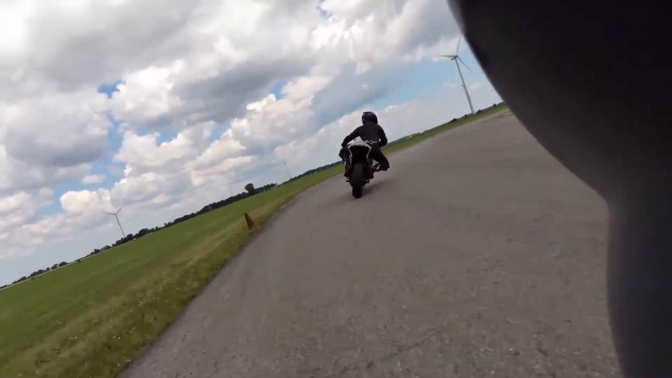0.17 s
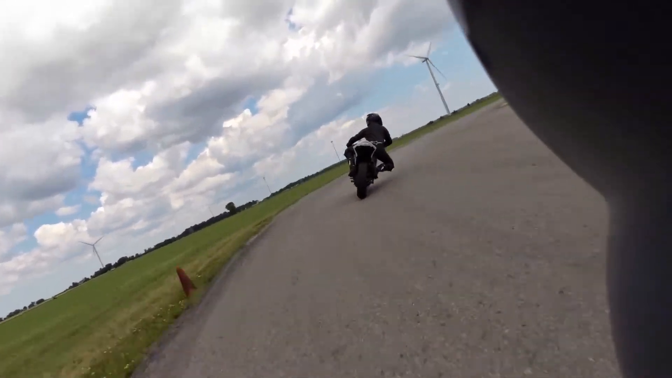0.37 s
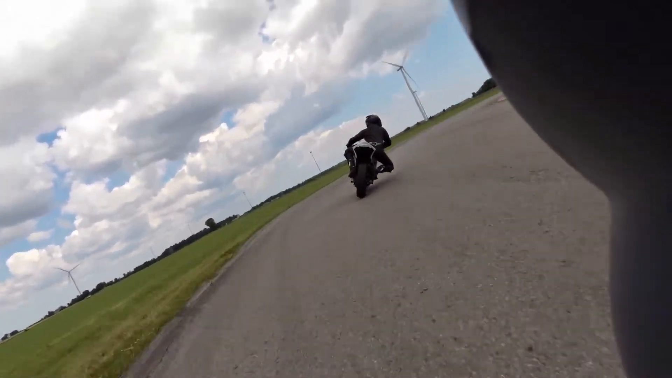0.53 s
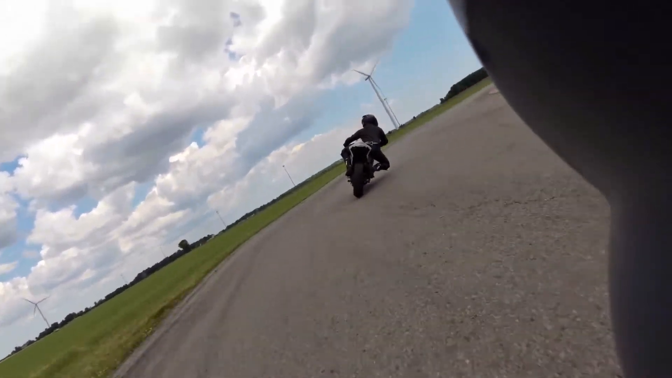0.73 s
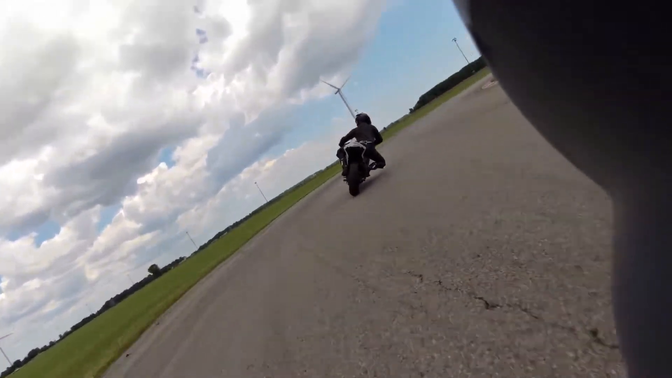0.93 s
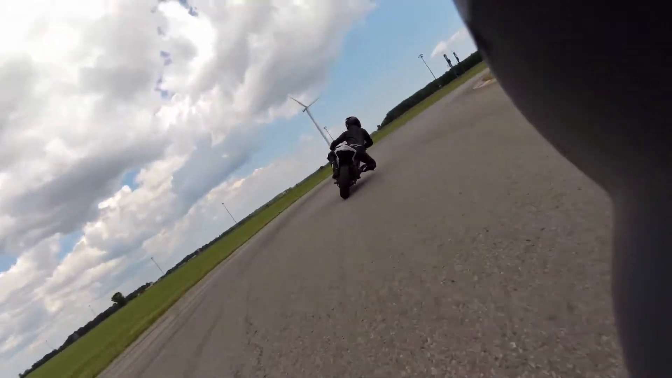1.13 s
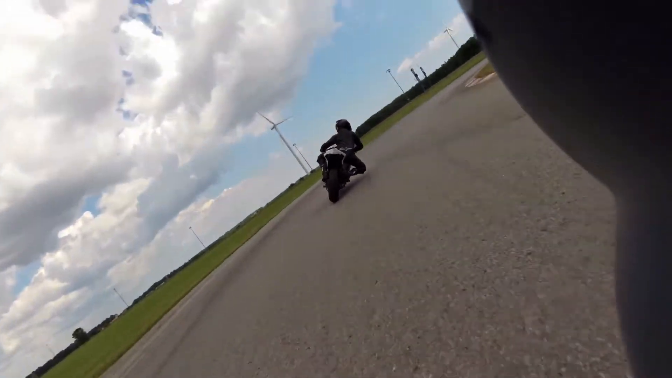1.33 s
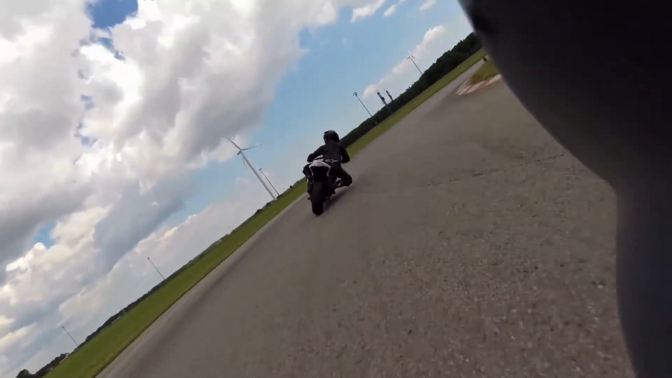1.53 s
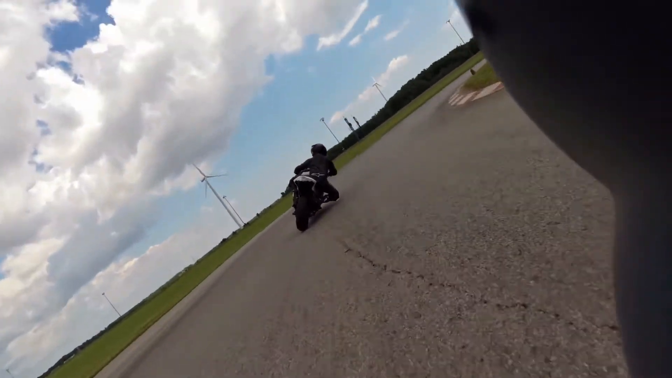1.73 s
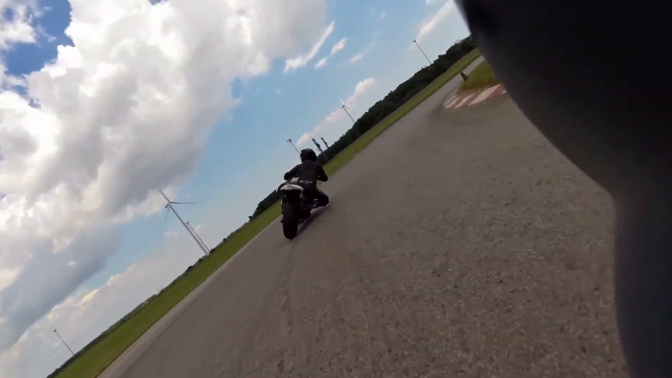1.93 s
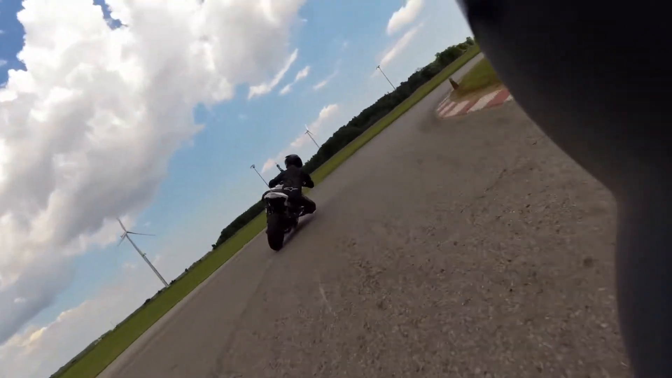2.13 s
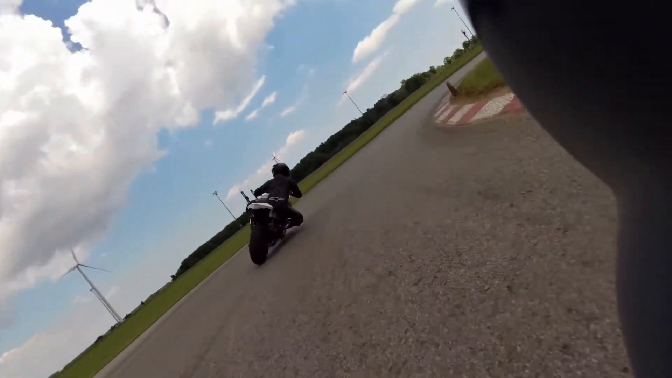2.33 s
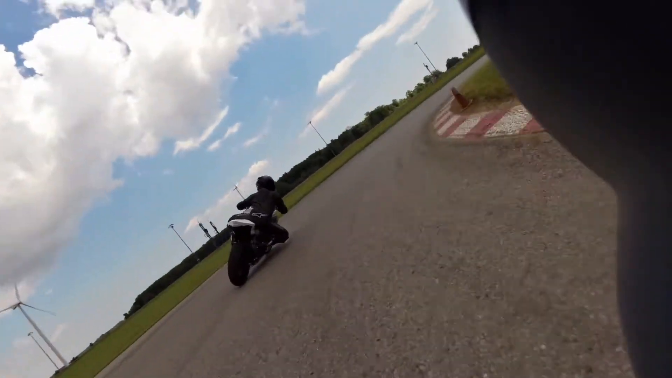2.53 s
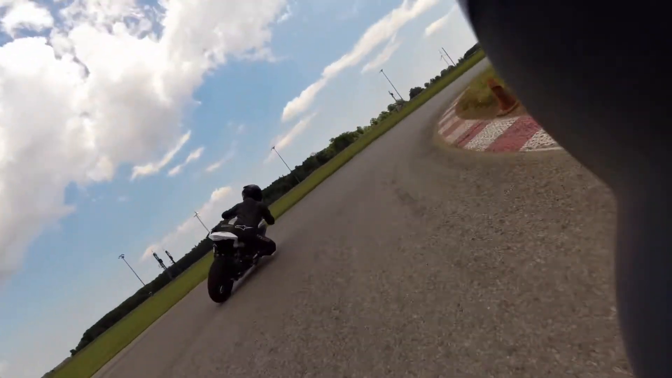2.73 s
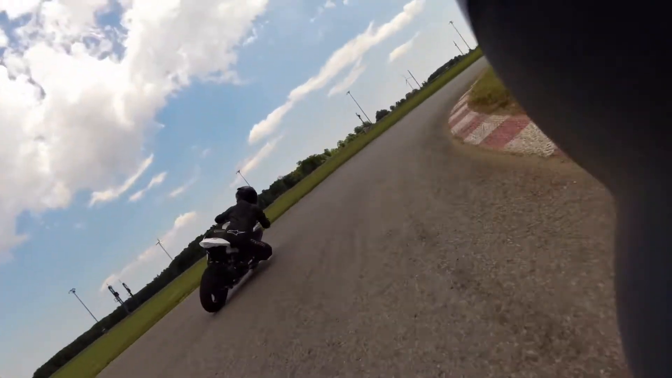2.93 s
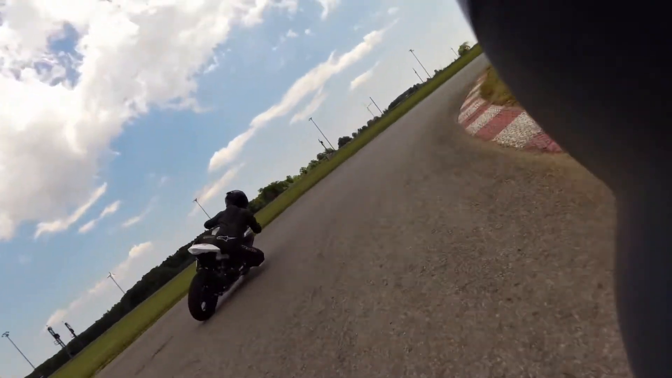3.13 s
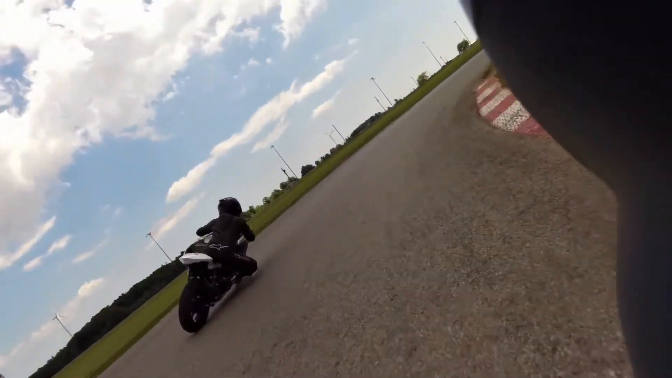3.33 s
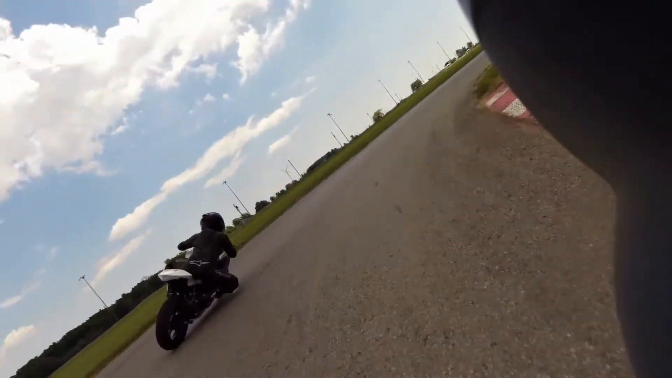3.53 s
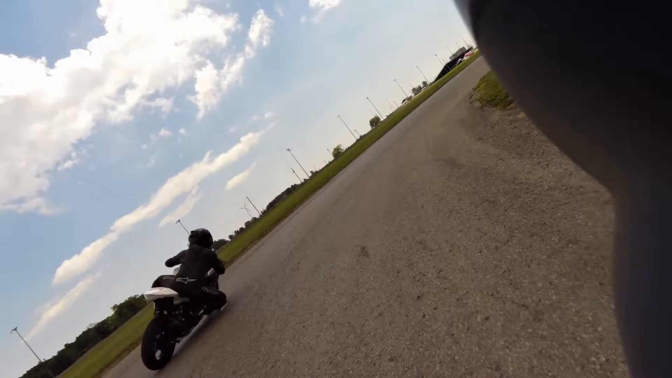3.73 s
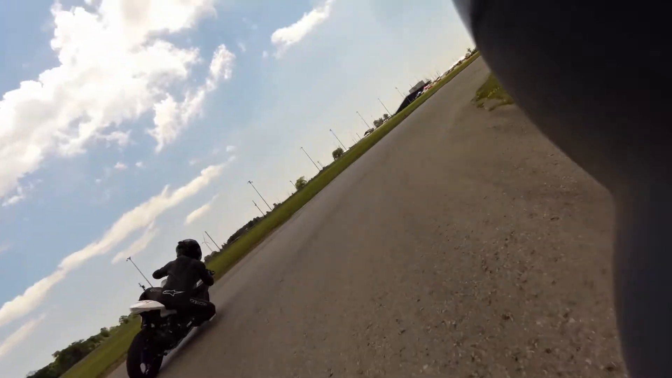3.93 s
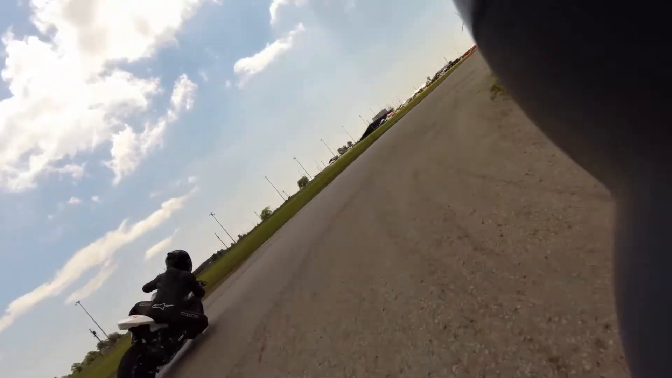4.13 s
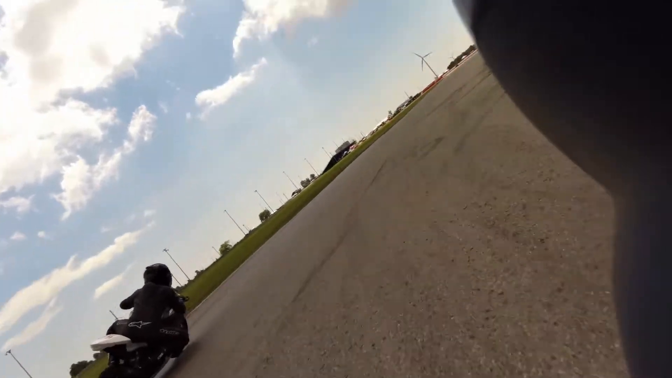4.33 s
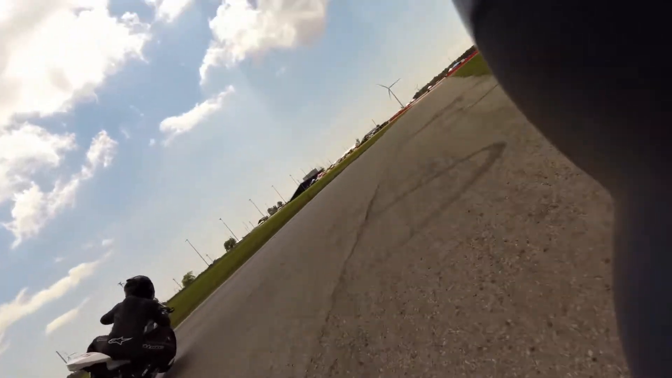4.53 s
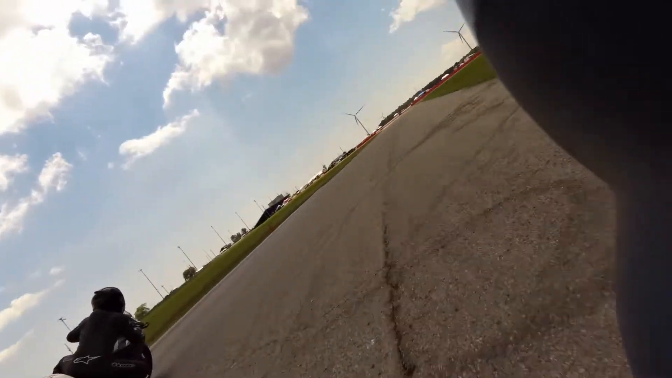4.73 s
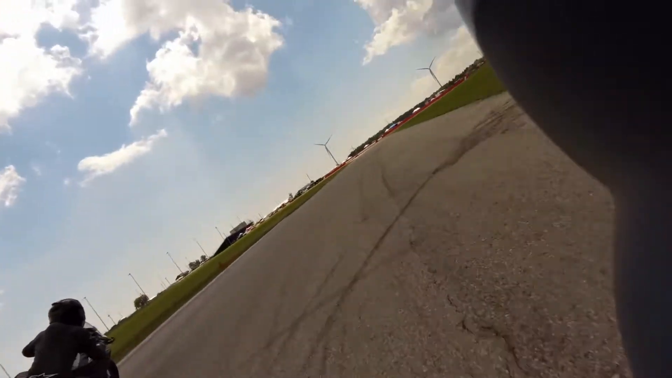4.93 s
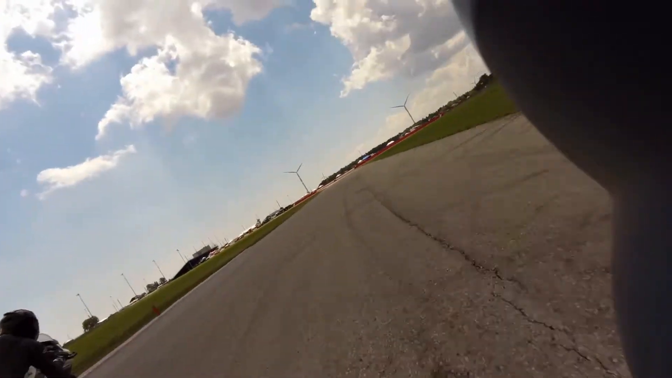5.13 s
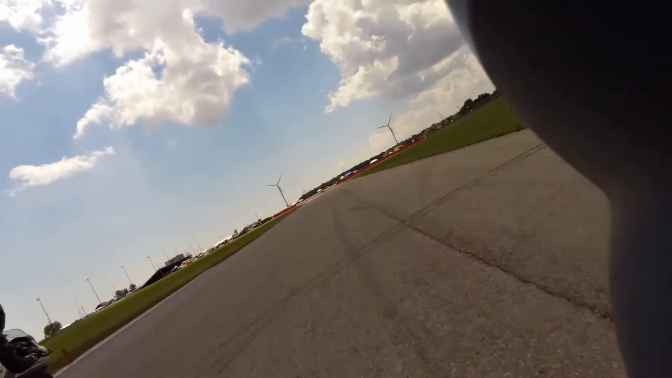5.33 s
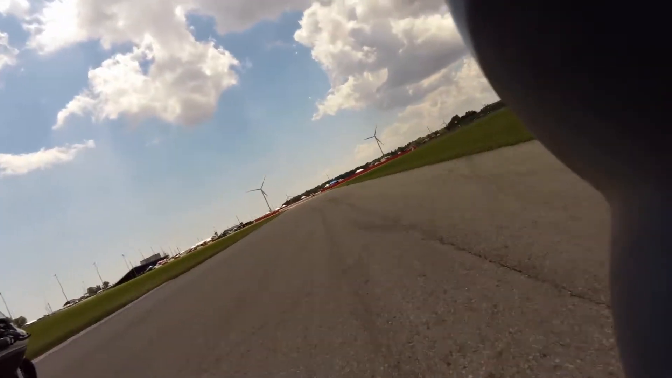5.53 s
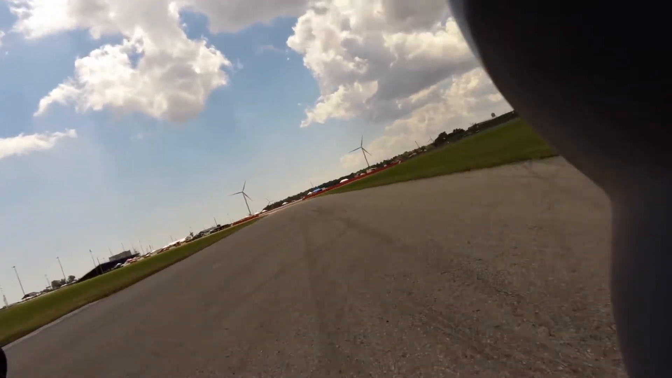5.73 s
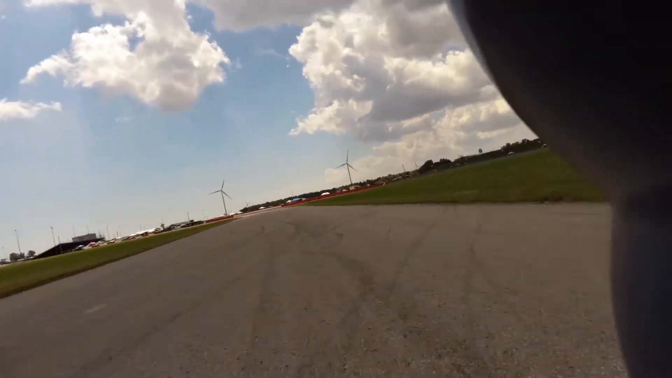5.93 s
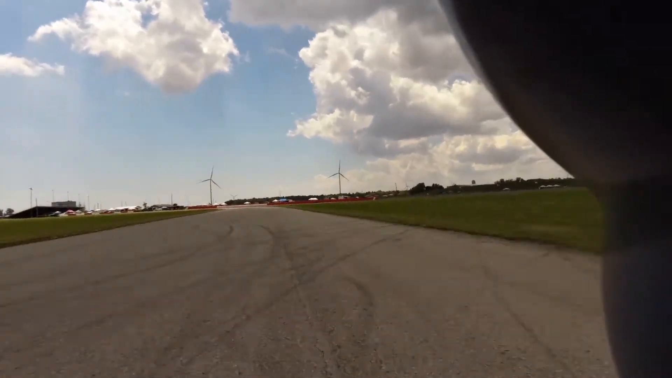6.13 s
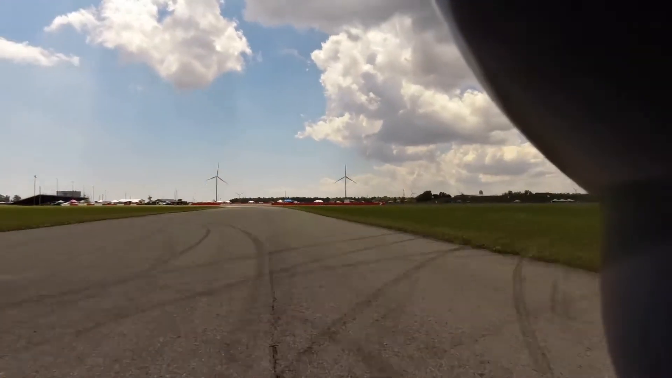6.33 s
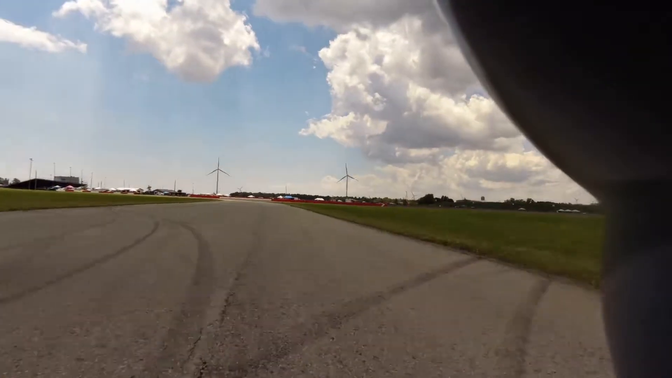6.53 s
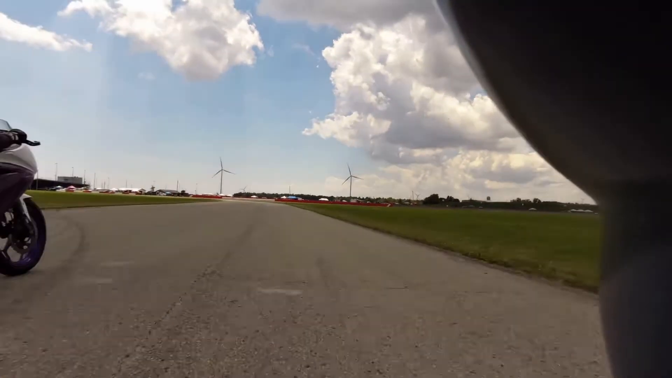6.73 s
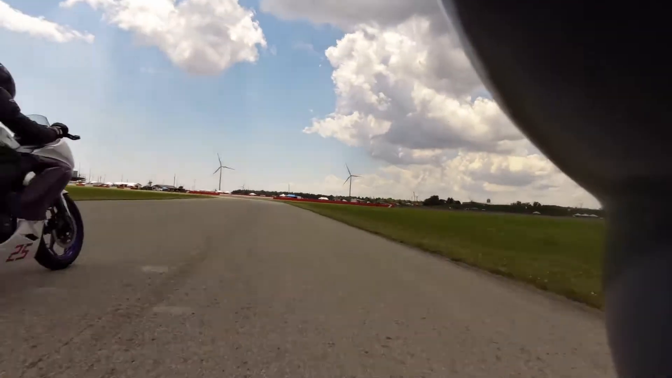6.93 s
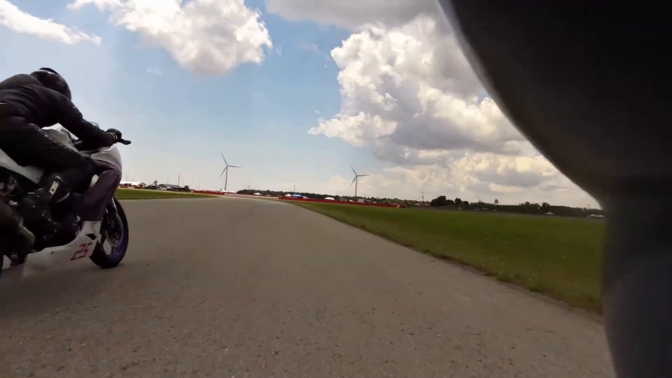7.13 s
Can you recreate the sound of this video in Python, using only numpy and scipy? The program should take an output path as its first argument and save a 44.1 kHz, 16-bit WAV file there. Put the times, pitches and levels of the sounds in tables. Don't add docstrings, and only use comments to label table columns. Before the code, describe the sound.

A microphone strapped to a sport motorcycle on an open race track. The engine begins loud and buzzing, falling in pitch while a loose housing rattles in bursts. It thins into a coast, with a bump, faint gear whine and low hum. Then the throttle opens, gears whine upward and the engine climbs, joined by a second bike's rising howl. Wind buffets the overloaded, muffled microphone.

```python
import sys
import numpy as np
from scipy import signal
from scipy.io import wavfile
from scipy.ndimage import uniform_filter1d

SR = 44100
rng = np.random.default_rng(int(sys.argv[2]) if len(sys.argv) > 2 else 0)


def to_linear_factor(level_db):
    exponent = np.asarray(level_db, float) / 20
    return 10 ** exponent


def pcm_store(signal):
    levels = np.round(np.clip(np.atleast_2d(signal), -1, 1) * 32767)
    wavfile.write(sys.argv[1], SR, levels.astype(np.int16).T)


N = 316638

OVERRUN_ENDS_S, OVERRUN_FADE_S = 2.06, 0.5
PULL_S, PULL_RISE_S = 4.5, 0.14


def rms_one(x):
    return x / np.sqrt(np.mean(x ** 2) + 1e-20)


def in_time(rows):
    s, *columns = np.transpose(rows)
    return [np.interp(np.arange(N) / SR, s, c) for c in columns]


def at_hz(points, hz):
    point_hz, point_db = np.transpose(points)
    return np.interp(np.log(hz), np.log(point_hz), point_db)


def smooth(coarse):
    return np.interp(np.arange(N) / 40, np.arange(len(coarse)), coarse)


def ramp(start_s, rise_s):
    return np.clip((np.arange(N) / SR - start_s) / rise_s, 0, 1)


def drift(rate):
    r = np.exp(-80 * np.pi * rate / SR)
    settle = 2000
    white = rng.standard_normal(len(range(0, N, 40)) + settle)
    return rms_one(signal.lfilter([1], [1, -2 * r, r * r], white)[settle:])


def resonance(x, hz, width_hz):
    r = np.exp(-np.pi * width_hz / SR)
    top = np.array([1, 0, -1]) * (1 - r * r) / 2
    return signal.lfilter(top, [1, -2 * r * np.cos(2 * np.pi * hz / SR), r * r], x + 1e-18)


def banded_noise(spectrum, tilt, patchy_db, low_hz, count):
    edges = low_hz * 2 ** (np.arange(count + 1) / 3)
    white = rng.standard_normal((2, N))
    out, power = 0, 0
    for k, (low, high) in enumerate(zip(edges, edges[1:])):
        sos = signal.butter(2, [low, high], "band", fs=SR, output="sos")
        band = signal.sosfilt(sos, white[k % 2])
        hz = np.sqrt(low * high)
        band_db = at_hz(spectrum, hz)
        out = out + band * smooth(to_linear_factor(band_db + tilt * np.log2(hz / 200) + patchy_db * drift(26)))
        power += to_linear_factor(2 * band_db) * 2 * (high - low) / SR
    return out / np.sqrt(power)


def crank(hz, wander):
    return np.cumsum(hz) / SR + smooth(wander * drift(10))


def partial(turns, order, level_db, flutter_db, lead=0.):
    height = np.sqrt(2) * smooth(to_linear_factor(level_db[::40] + flutter_db * drift(20)))
    return height * np.cos(2 * np.pi * order * turns + lead)


def whine(rows, wander):
    before = (0.015, rows[0][1], -92.5)
    after = (N / SR, rows[-1][1], -90)
    hz, level_db = in_time([before] + rows + [after])
    return partial(crank(hz, wander), 0.99, level_db, flutter_db=2.0)


def own_throttle():
    # (time [s], firing rate [Hz], shake [dB], edge of the firing pulse [dB])
    ride = [(0.0, 217.2, -9.5, -5), (0.48, 202.5, -11, 1), (0.85, 198, -21, -1.5), (1.05, 196.7, -16.5, 1),
            (1.22, 196.8, -22, -4), (1.4, 194.2, -16, -0.5), (1.7, 193.2, -22.5, -2),
            (1.8, 193.8, -48.5, -2), (2.1, 192.6, -23.5, 1), (2.4, 187.5, -45, -5),
            (2.7, 188.7, -31.5, -15.5), (3.4, 178, -28.5, -21), (4.05, 187.5, -34, -12),
            (4.3, 195.3, -19, -5), (4.8, 213.7, -8, -7), (5.2, 232, -13, -1.5), (5.6, 236.1, -12.5, 1),
            (7.18, 263, -13.5, 1.5)]
    return in_time(ride)


def own_engine(turns, hz, shake_db, edge_db):
    # (order [x firing], overrun [dB], under power [dB], share of a lull in the shake [dB/dB])
    overtones = [
        (2, -19, -19, 0.02),
        (3, -17, -38, .4),
        (4, -21.5, -29.5, .3),
        (5, -34.5, -31, 0.18),
    ]
    # (order [x firing], level under order 4 [dB])
    upper = [
        (6, -12.5),
        (7, -16),
    ]
    lull_below_db = -22.5
    power = ramp(OVERRUN_ENDS_S, OVERRUN_FADE_S)
    above_lull_db = shake_db - lull_below_db
    orders_db = {}
    for k, over_db, pull_db, share in overtones:
        mix_db = over_db + power * (pull_db - over_db)
        orders_db[k] = edge_db + mix_db + share * np.minimum(above_lull_db, 0)

    bracket_hz, bracket_width_hz, bracket_loss_db = 600.2, 39.6, 28
    orders_db[3] -= bracket_loss_db * np.clip((3 * hz - bracket_hz) / bracket_width_hz, -1, 1) ** 4
    orders_db[2] -= 0.34 * np.maximum(above_lull_db, 0) * (1 - power)

    rough_overrun_db, rough_power_db = 1.8, 3.5
    rough_db = (rough_overrun_db + power * (rough_power_db - rough_overrun_db))[::40]
    out = partial(turns, 1, shake_db, flutter_db=rough_db)
    for k, db in orders_db.items():
        lead_rad = 1.1 * (k == 3)
        out += partial(turns, k, db, flutter_db=rough_db, lead=lead_rad)
    for k, db in upper:
        out += partial(turns, k, orders_db[4] + db, flutter_db=1.5)
    return out


def wind_buffet():
    # (time [s], buffet [dB])
    gust_levels = [(0, -25), (.5, -26), (1.1, -28.5), (1.55, -24), (1.75, -26), (1.96, -26), (2.25, -24),
                   (2.64, -22.5), (2.78, -22), (3.22, -24), (3.8, -25), (4.1, -22), (4.56, -20.5),
                   (4.8, -19.5), (5.4, -17.5), (5.95, -16.5), (6.4, -15.5), (7.18, -12.5)]
    # (frequency [Hz], density [dB per Hz])
    buffet_spectrum = [(25, -30.5), (45, -24.5), (70, -4.5), (110, -1.5), (165, 0), (240, -5), (400, -7),
                       (600, -13.5), (900, -14), (1400, -31.5), (2200, -43.5), (3500, -73)]
    buffet_db, = in_time(gust_levels)
    tilt = 0.29 + 2 * (1 - ramp(OVERRUN_ENDS_S, OVERRUN_FADE_S))
    gusts = to_linear_factor(buffet_db + 7 + smooth(1.7 * np.tanh(drift(40))))
    return gusts * banded_noise(buffet_spectrum, tilt[::40], patchy_db=0.5, low_hz=34.93, count=19)


def engine_hiss(turns, shake_db, edge_db):
    # (frequency [Hz], density [dB per Hz])
    hiss_spectrum = [(500, 8.5), (1000, 0.5), (1500, 3), (1800, -1), (2100, -5.5), (2600, -5), (3300, -13),
                     (3850, -12.5), (4500, -18.5), (5200, -43), (6500, -33), (9000, -38)]
    effort_db = -31 + 0.24 * shake_db + 0.3 * edge_db
    effort_db += 6 * (ramp(PULL_S, PULL_RISE_S) - ramp(OVERRUN_ENDS_S, OVERRUN_FADE_S))
    swell_db = 3.16 * np.cos(2 * np.pi * (turns - 0.15))
    gate = to_linear_factor(effort_db + 8.5 + swell_db + smooth(2.0 * drift(37)))
    return gate * banded_noise(hiss_spectrum, 0, patchy_db=0.0, low_hz=565, count=11)


def housing_air():
    return to_linear_factor(-49.5) * rms_one(resonance(rng.standard_normal(N), 3850, 280))


def rattle(turns, shake):
    # (time [s], peak [dB],
    # length [ms])
    bursts = [(0.07, -26, 9.9), (.121, -30, 6.2), (.159, -29, 7.9), (.234, -24, 13), (.278, -31, 48),
              (.358, -24.5, 34), (.425, -22, 52), (.468, -23, 21), (.542, -23.5, 39), (.6, -21, 160),
              (.71, -22.5, 70), (.766, -24.5, 21), (.838, -23, 20), (0.872, -27, 24), (.95, -26, 45),
              (1.029, -23.5, 80), (1.141, -27.5, 44), (1.33, -27.5, 29), (1.41, -20, 49),
              (1.465, -20.5, 43), (1.522, -24, 11), (1.574, -25, 18.8), (1.641, -23, 9), (1.687, -25, 38),
              (.305, -32, 30), (.805, -29, 22), (2.06, -24.5, 11), (2.1, -26.5, 43), (2.226, -22.5, 18),
              (2.155, -34.5, 25), (2.635, -37, 8), (4.64, -35, 25), (4.694, -29.5, 19),
                   (4.789, -31, 45), (5.01, -34, 30), (4.88, -39, 31), (5.16, -41, 35), (5.26, -37.5, 30),
                   (5.93, -33, 35), (6.73, -33, 33), (6.8, -30, 15), (6.85, -30, 21), (7.0, -33, 55)]
    # (lag after the peak [cycles], level [dB])
    contacts = [
        (.11, 0),
        (.2, -12),
        (.61, -9),
    ]
    # (frequency [Hz], width [Hz], level [dB])
    shell_modes = [
        (1540, 450, 2),
        (2740, 520, 0),
        (4076, 500, 0.5),
        (5014, 900, -9.5),
        (8600, 3900, -13),
    ]
    t = np.arange(N) / SR
    strength = ramp(PULL_S, PULL_RISE_S) * to_linear_factor(-46 + smooth(3.5 * np.tanh(drift(12))))
    for s, db, ms in bursts:
        near = slice(max(int((s - 0.12) * SR), 0), int((s + 0.12) * SR))
        rise_or_fall = np.where(t[near] < s, 0.6, 1)
        burst = to_linear_factor(db) * np.exp(-((t[near] - s) / (ms * 0.00073 * rise_or_fall)) ** 2)
        strength[near] = np.maximum(strength[near], burst)
    strength *= to_linear_factor(smooth(2.5 * drift(30)))

    hits = np.zeros(N)
    for lag, db in contacts:
        at = np.flatnonzero(np.diff(np.floor(turns - lag)) > 0)
        early_late = rng.integers(-4, 5, len(at))
        hits[np.clip(at + early_late, 0, N - 1)] = to_linear_factor(db)

    fall = -np.gradient(uniform_filter1d(shake, size=15)) * SR / 1000
    steepest = (fall > np.roll(fall, 1)) & (fall >= np.roll(fall, -1))
    knocks = steepest * np.clip(fall - 1.5, 0, 1.5) * to_linear_factor(-6.5)

    taps = -(hits * strength * to_linear_factor(32) + knocks) * to_linear_factor(2.2 * rng.standard_normal(N))
    out = np.zeros(N)
    for k, (hz, width_hz, db) in enumerate(shell_modes):
        out += (-1) ** k * to_linear_factor(db) * resonance(taps, hz, width_hz)
    return out


def jolts():
    # (time [s], peak [dB], frequency [Hz])
    bumps = [(2.1, -10, 420), (2.6315, 1, 460), (2.6332, -5, 780), (2.1, -9.5, 200), (2.6, -16.5, 370),
             (3.25, -10.5, 300), (2.6335, -11.5, 1330), (3.275, -10, 600), (3.8, -10.5, 480),
             (6.7, -1.5, 380), (3.688, -16.5, 580), (4.009, -16, 360)]
    out = np.zeros(N)
    t = np.arange(600) / SR
    for s, db, hz in bumps:
        start = int(s * SR)
        out[start:start + 600] += to_linear_factor(db) * np.sin(2 * np.pi * hz * t) * np.exp(-t * hz * 0.84) * 2
    return out


def rival():
    # (time [s], firing rate [Hz], level [dB])
    pass_by = [
        (2.59, 186.8, -30),
        (2.99, 197, -35),
        (3.39, 201.5, -33),
        (4.19, 217.1, -33.5),
        (4.7, 230.9, -25),
        (5.19, 243.9, -24),
        (5.7, 261.5, -24),
        (6.19, 274.7, -25.5),
        (6.7, 289.7, -27),
        (7.18, 291, -24),
    ]
    # (multiple of firing [x], part throttle [dB], full throttle [dB])
    pipe = [(1, -0.5, 1.5), (1.25, 0, -1), (1.5, -17, -0.5), (1.75, -12, -8), (2, 5.5, -1),
            (2.25, 4.5, 1.5), (2.5, -9, 0.5), (2.75, -7, -13.5), (3, 2, -18.5), (3.25, -16, -12),
            (3.5, -22.5, -3.5)]
    hz, level_db = in_time(pass_by)
    t = np.arange(N) / SR
    turns = crank(hz, wander=0.034)
    level_db = level_db - 60 * np.clip((pass_by[0][0] + 0.28 - t) / 0.5, 0, 1)
    throttle = ramp(4.1, 0.53)
    out = np.zeros(N)
    for k, part_db, full_db in pipe:
        line_db = level_db + part_db + throttle * (full_db - part_db)
        out += partial(turns, k, line_db, flutter_db=1.0, lead=rng.uniform(0, 2 * np.pi))
    return out


def coasting_whine():
    # (time [s], frequency [Hz], level [dB])
    glide = [
        (2.7, 1532, -51),
        (2.9, 1500, -42.5),
        (3.22, 1465, -46),
        (3.5, 1418, -45.5),
        (3.66, 1450, -46),
        (3.74, 1392, -42),
        (3.97, 1510, -37.5),
        (4.08, 1530, -39.5),
        (4.2, 1516, -68),
    ]
    return whine(glide, wander=0.11)


def frame_hum():
    # (time [s], frequency [Hz], level [dB])
    hum = [
        (3.0, 164.8, -43),
        (3.2, 164.7, -23),
        (3.45, 167, -20.5),
        (3.65, 169, -25.5),
        (3.8, 169.8, -45.5),
    ]
    return whine(hum, wander=0.043)


def drive_whine():
    # (time [s], frequency [Hz], level [dB])
    take_up = [
        (3.9, 733, -45),
        (4.02, 745.4, -28.5),
        (4.3, 811, -23),
        (4.4, 800, -20.5),
        (4.47, 835, -20),
        (4.6, 838, -20),
        (4.71, 882, -21.5),
        (4.9, 880, -24.5),
        (5.05, 866, -41),
    ]
    return whine(take_up, wander=0.2)


def scene():
    hz, shake_db, edge_db = own_throttle()
    turns = crank(hz, wander=0.035)
    shake = own_engine(turns, hz, shake_db, edge_db) + wind_buffet() + rival()
    mono = shake + engine_hiss(turns, shake_db, edge_db) + housing_air()
    mono += rattle(turns, shake) + jolts()
    mono += coasting_whine() + frame_hum() + drive_whine()
    return np.array([mono, mono])


def starve(x):
    band_edges = [4900, 5100, 5300, 5460, 5750, 6000, 6300, 6560, 7000, 7900, 8450, 9480, 10500]
    hz, _, frames = signal.stft(x, SR, nperseg=2048)
    loudness = np.sqrt(np.sum(np.abs(frames) ** 2, axis=0))
    keep = to_linear_factor(-85) + to_linear_factor(-73.5) * loudness
    for low, high in zip(band_edges, band_edges[1:] + [SR]):
        band = (hz >= low) & (hz < high)
        level = np.sqrt(np.mean(np.abs(frames[band]) ** 2, axis=0))
        chance = to_linear_factor(4.5 * rng.standard_normal(len(keep)))
        frames[band] *= level > keep * chance
    return signal.istft(frames, SR, nperseg=2048)[1][:N]


def top_cut(x):
    return signal.sosfilt(signal.butter(12, 17500, fs=SR, output="sos"), x)


def record(dry):
    x = dry[0] + 0.27 * (np.clip(dry[0], -1.5, 1.5) ** 2 - np.mean(dry ** 2))
    x = signal.sosfilt(signal.butter(3, 55, "high", fs=SR, output="sos"), x)
    x = x / (1 + np.abs(x / 0.985) ** 3) ** (1 / 3)
    x = signal.sosfilt(signal.butter(2, 46, "high", fs=SR, output="sos"), x)
    x = starve(signal.sosfilt(signal.butter(5, 5200, fs=SR, output="sos"), x))
    treble = x - signal.sosfiltfilt(signal.butter(3, 850, fs=SR, output="sos"), x)
    x = x + treble * (to_linear_factor(np.array([[-0.75], [0.75]])) - 1)
    mix = np.clip(x, -1, 1)
    return top_cut(mix)


dry = scene()
out = record(dry)
pcm_store(out)
```